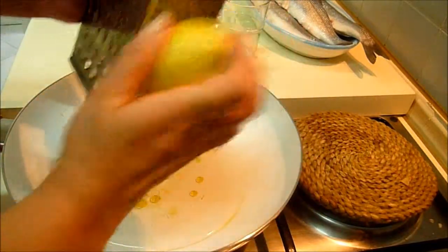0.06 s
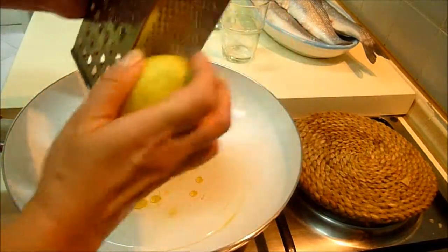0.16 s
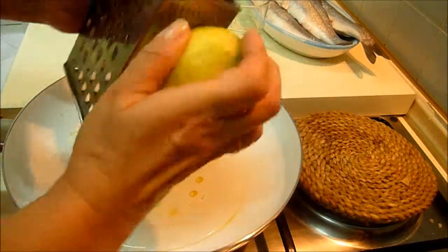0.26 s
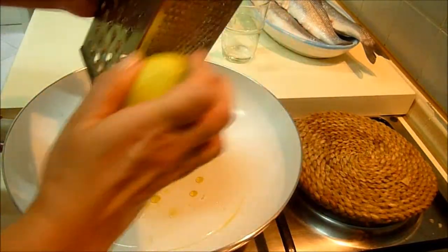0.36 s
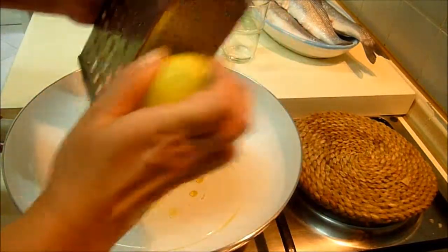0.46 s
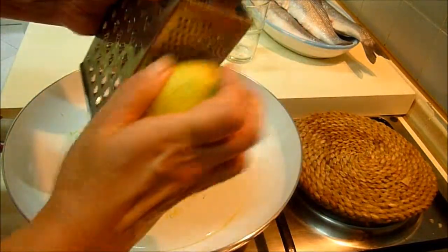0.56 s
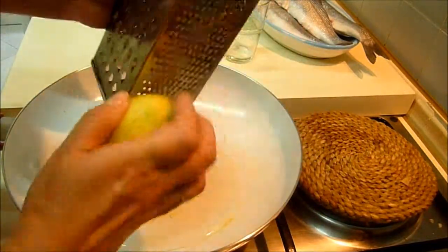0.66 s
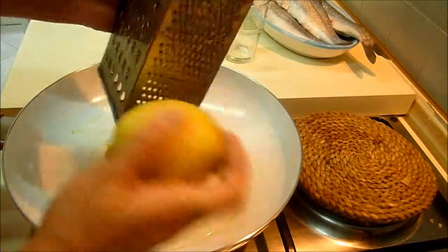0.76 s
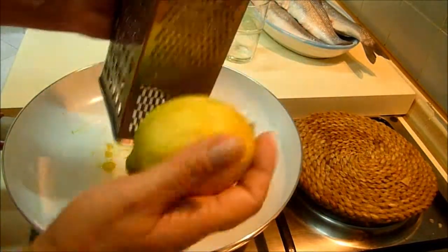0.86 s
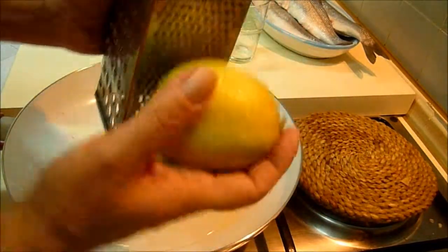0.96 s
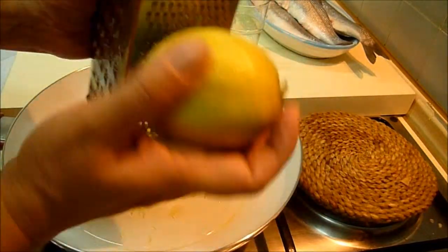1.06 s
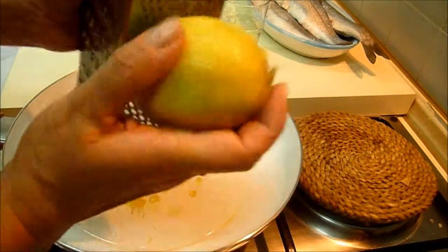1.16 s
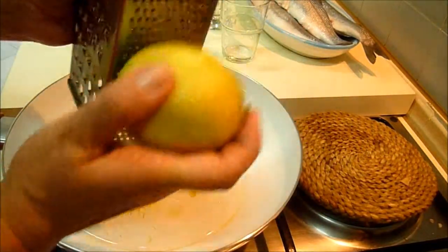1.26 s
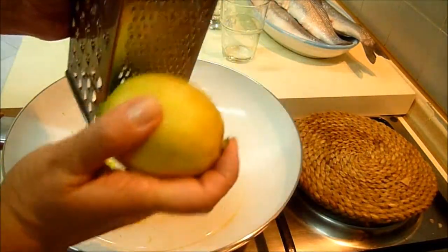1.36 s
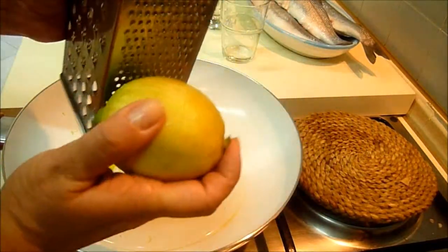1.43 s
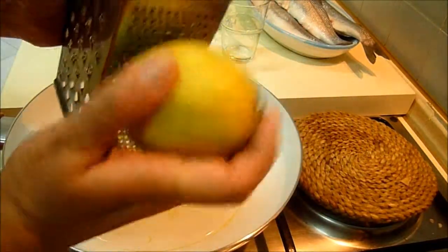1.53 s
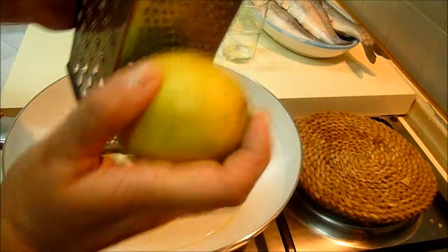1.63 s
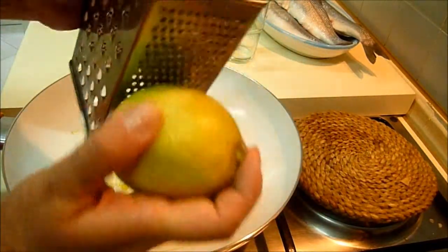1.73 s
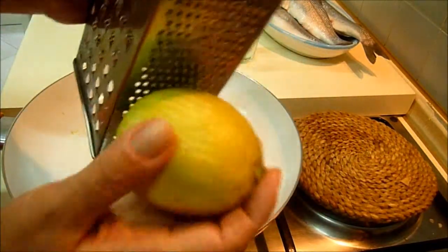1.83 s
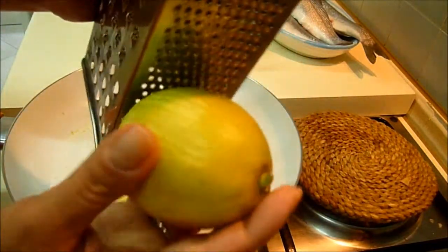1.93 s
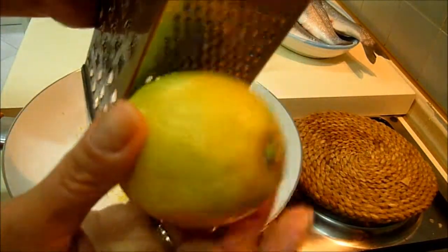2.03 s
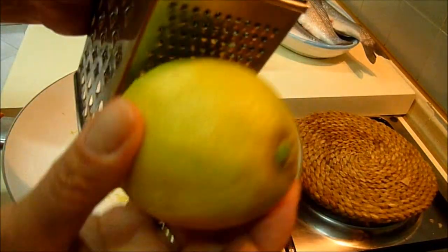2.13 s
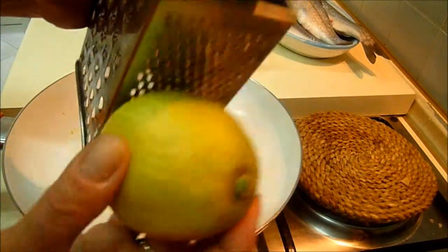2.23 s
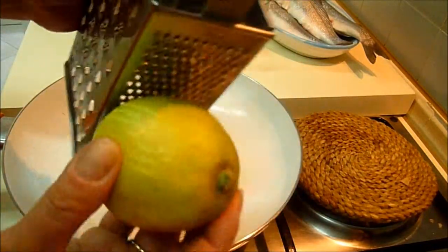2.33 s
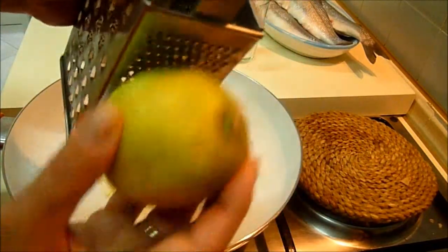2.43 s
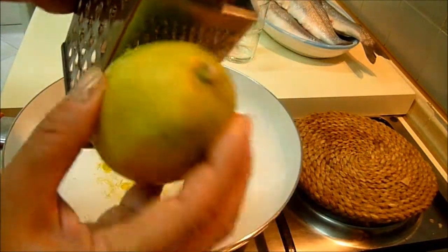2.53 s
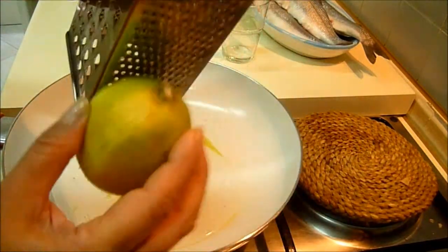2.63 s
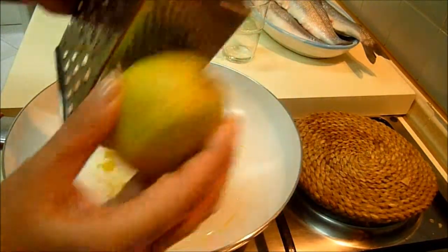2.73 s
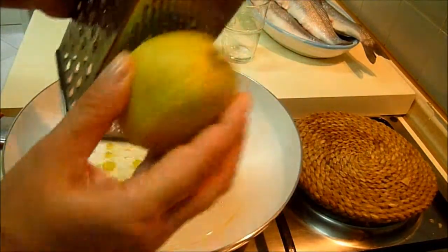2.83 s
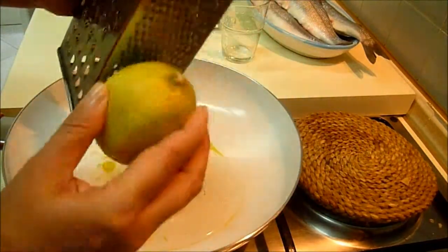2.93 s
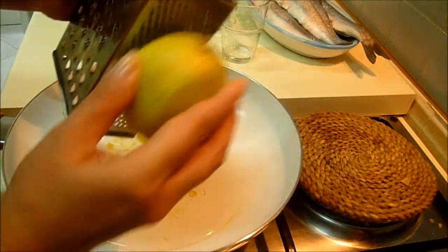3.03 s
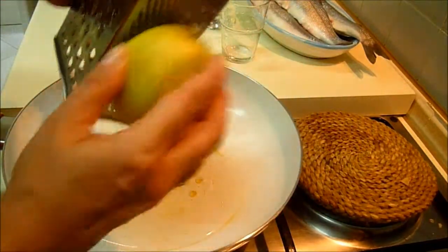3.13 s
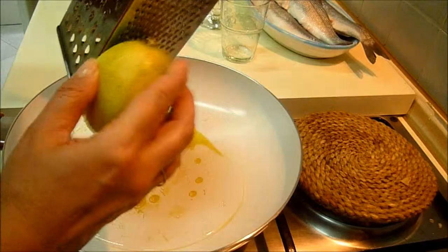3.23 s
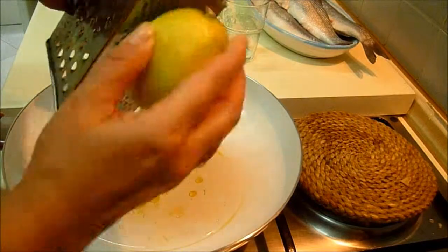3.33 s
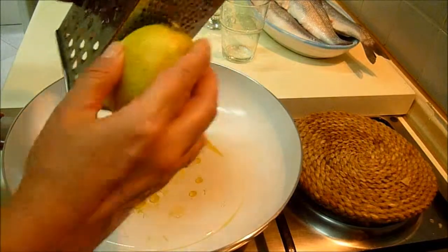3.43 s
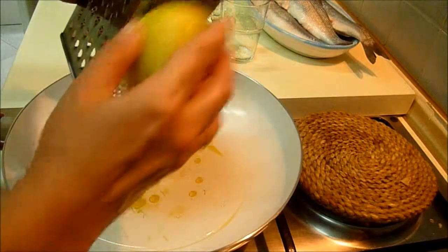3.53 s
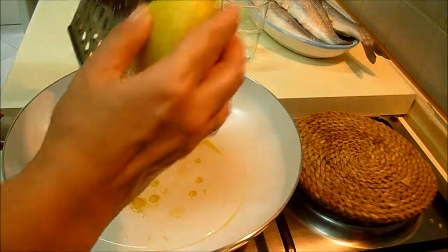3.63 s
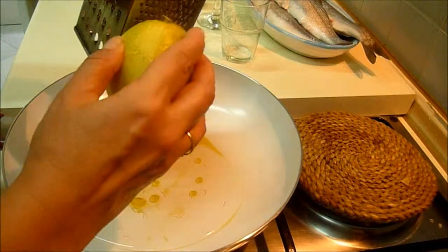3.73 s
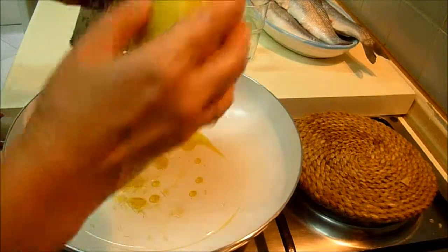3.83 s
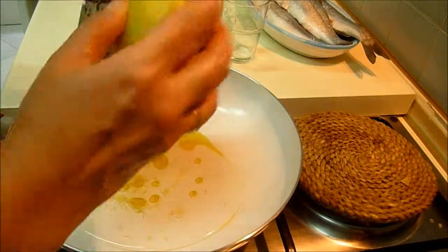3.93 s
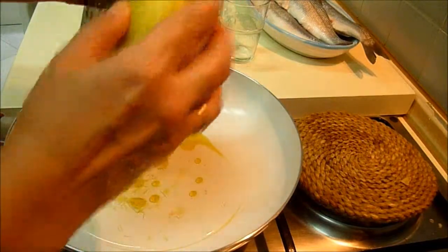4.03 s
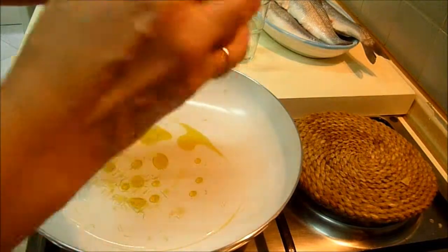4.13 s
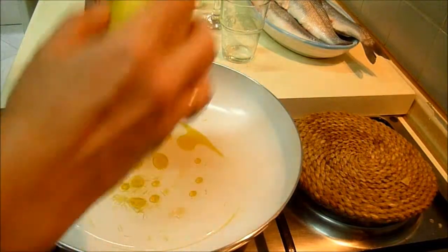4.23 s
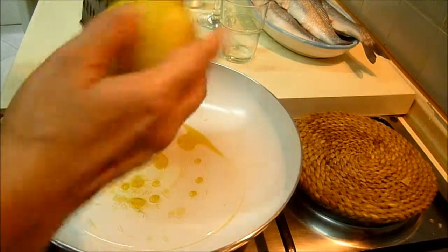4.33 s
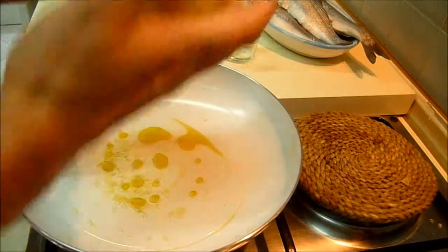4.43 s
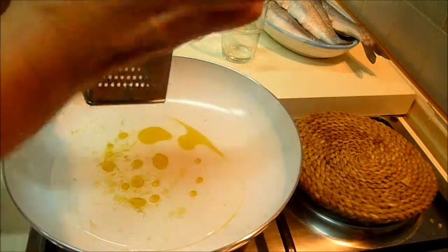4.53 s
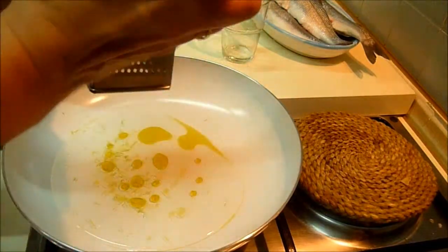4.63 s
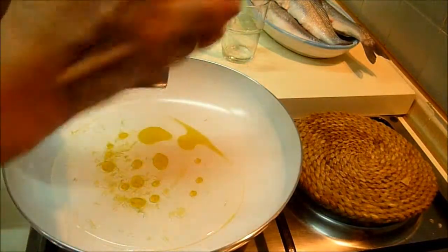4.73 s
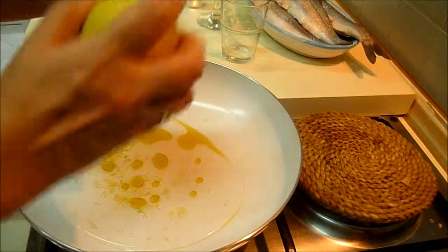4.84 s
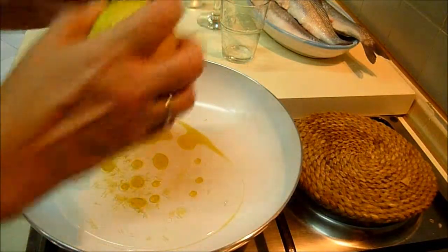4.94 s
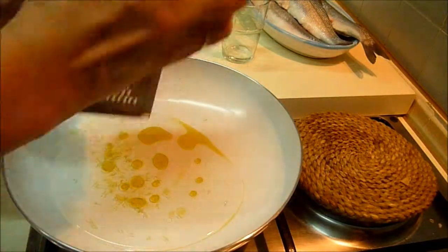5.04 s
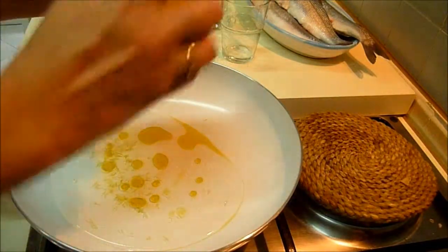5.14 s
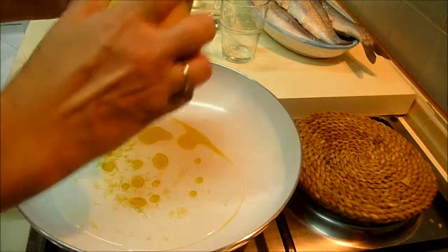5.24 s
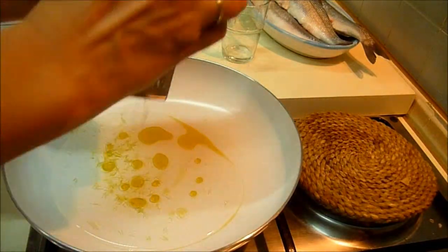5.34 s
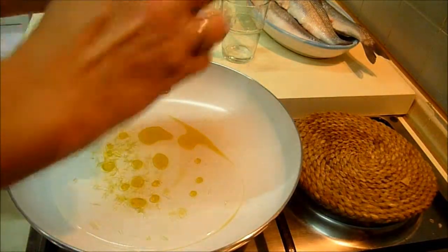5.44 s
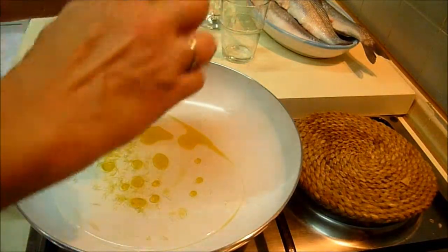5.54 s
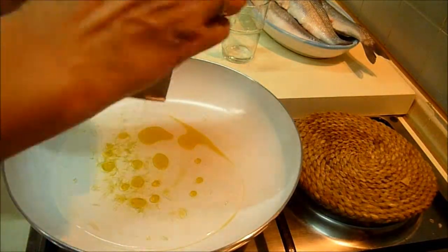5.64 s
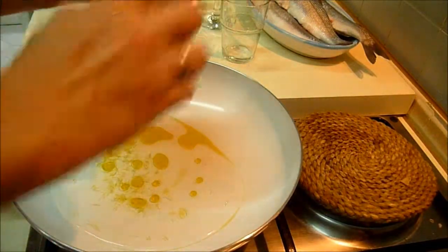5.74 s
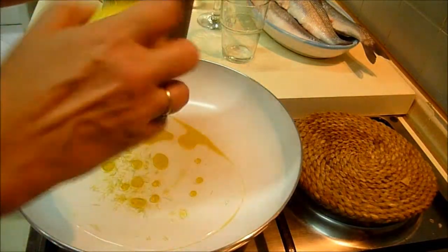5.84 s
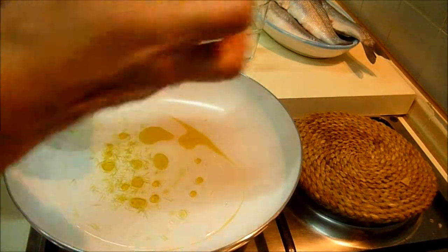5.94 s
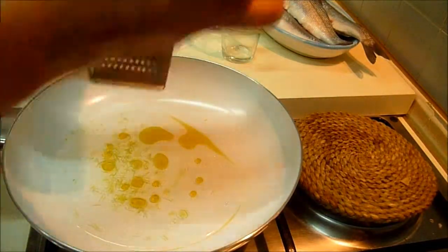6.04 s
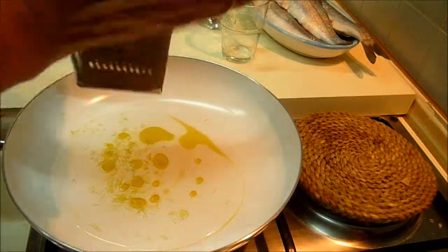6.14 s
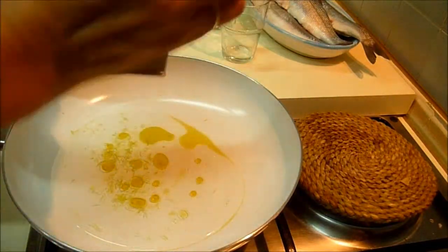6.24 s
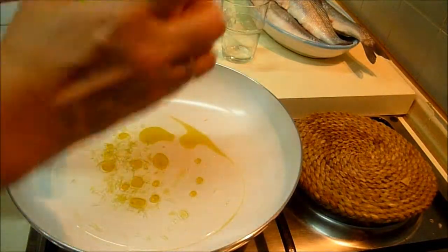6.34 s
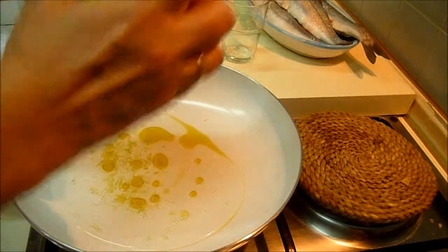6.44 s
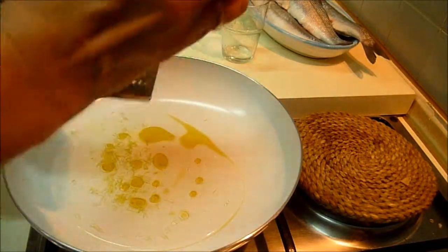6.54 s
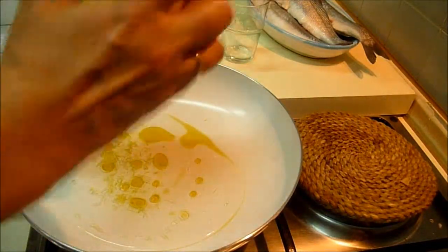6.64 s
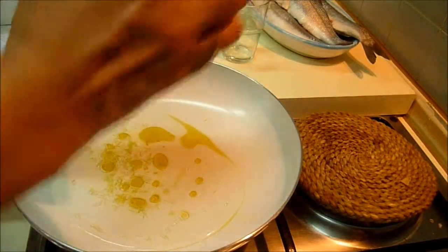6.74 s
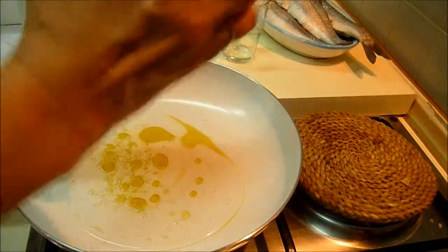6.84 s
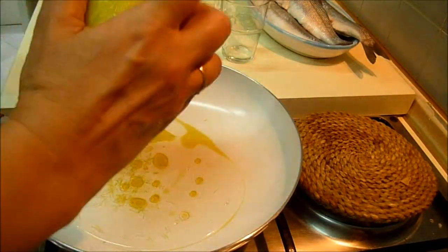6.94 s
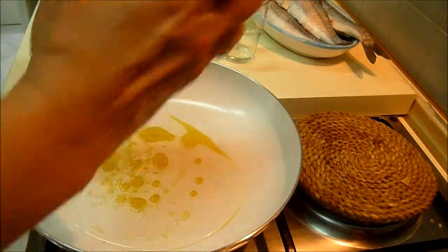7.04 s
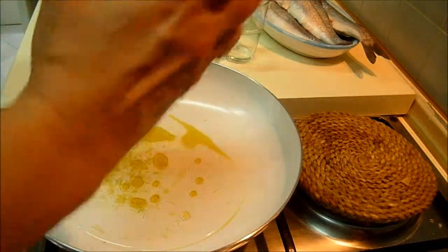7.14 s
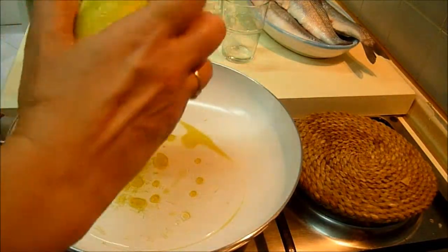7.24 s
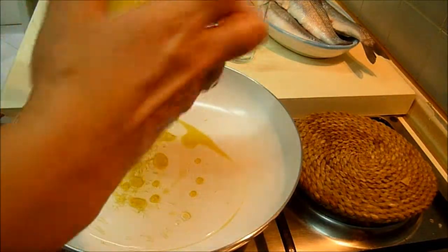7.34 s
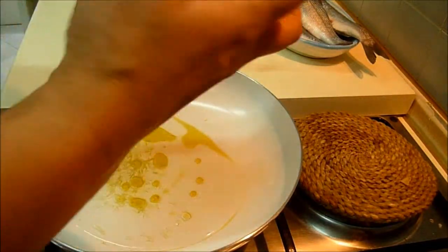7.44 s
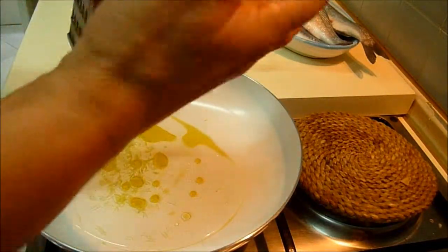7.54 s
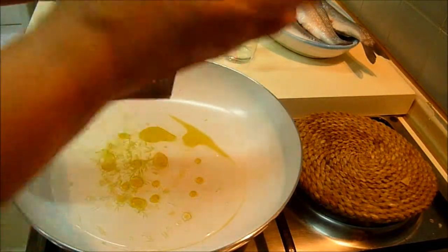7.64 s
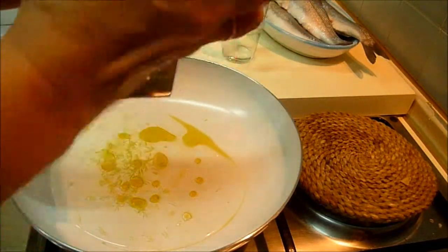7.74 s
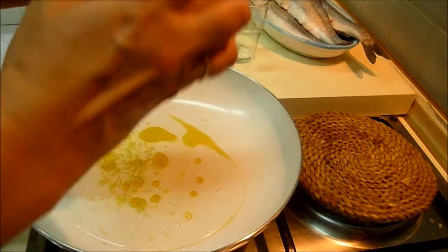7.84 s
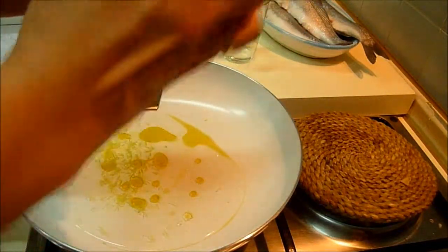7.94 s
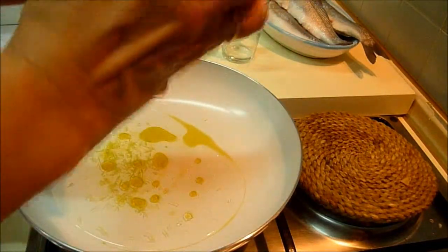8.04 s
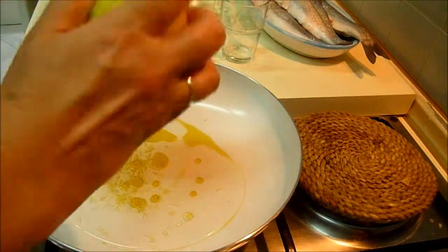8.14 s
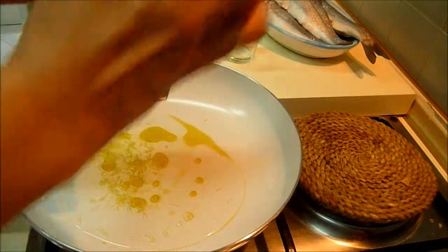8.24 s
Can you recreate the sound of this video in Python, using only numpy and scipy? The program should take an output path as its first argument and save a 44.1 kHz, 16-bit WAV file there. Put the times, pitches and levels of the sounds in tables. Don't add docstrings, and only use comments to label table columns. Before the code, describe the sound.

Close to a small camera microphone, a lemon is rubbed on a hollow steel box grater in a kitchen with a short echo. Three brisk rasps come in the first 0.7 seconds, each a rapid stutter of three or four bites with a tinny ring. Then it is sparse: a faint touch at 1, scratchy catches around 1.3 and 1.65, a small scrape near 2.2. From 2.55 regular grating begins, roughly four strokes a second, with quieter sliding returns between, growing stronger towards 4.2. A light metallic bump falls at 4.5, then longer, dense rasps continue to 5.8. The hardest hollow knock comes at 6.17, followed by a long stroke and strong, sharp rasps until 7.25. A thudding bump at 7.67 leads to scratchy catches, a last strong rasp at 8.1 and a soft slide. Low appliance hum, faint fluttering camera whine and handling rumble run throughout; the treble is cut off.

```python
import sys
import numpy as np
from scipy import signal
from scipy.fft import rfft, irfft
from scipy.io import wavfile
from scipy.ndimage import uniform_filter1d, map_coordinates

SR = 44100
rng = np.random.default_rng(int(sys.argv[2]) if len(sys.argv) > 2 else 0)


def persist_wave(psi):
    counts = np.round(np.clip(psi, -1, 1) * 32767).astype(np.int16)
    wavfile.write(sys.argv[1], SR, np.atleast_2d(counts).T)


def amplitude_ratio(level_db):
    exponent = np.asarray(level_db, float) / 20
    return 10 ** exponent


N = 365588


def unit(x):
    return x / np.sqrt(np.mean(x ** 2) + 1e-20)


def along(points, hz):
    f, v = np.transpose(points)
    return np.interp(np.log(hz + 1), np.log(f + 1), v)


def colour(spectrum, peaks, hz):
    peaks_db = sum(db / (1 + (2 * (hz - centre) / width) ** 2) for centre, width, db in peaks)
    return amplitude_ratio(along(spectrum, hz) + peaks_db)


def resonance(hz, centre, width):
    return 1 / (1 + (2 * (hz - centre) / width) ** 2)


def coloured(x, gain):
    m = 2 ** 14
    cepstrum = irfft(np.log(gain(np.fft.rfftfreq(m, 1 / SR)) + 1e-6))
    cepstrum[1:m // 2] *= 2
    cepstrum[m // 2 + 1:] = 0
    response = irfft(np.exp(rfft(cepstrum)))
    return signal.fftconvolve(x, response)[:len(x)]


def wobble(rate):
    points = rng.standard_normal(int(N * rate / SR) + 4)
    return map_coordinates(points, [np.arange(N) * rate / SR])


def patchy(x, depth_db, bins, frames):
    z = signal.stft(x, nperseg=512)[2]
    field = uniform_filter1d(rng.standard_normal(z.shape), bins, 0)
    field = uniform_filter1d(field, frames, 1)
    return signal.istft(z * amplitude_ratio(depth_db * unit(field)), nperseg=512)[1][:N]


def over(hz, edge_hz):
    return 1 / (1 + (edge_hz / (hz + 1)) ** 8)


def background():
    # frequency in Hz, level in dB per Hz.
    hum_curve = [(15, -36), (25, -3), (33, -14.5), (105, -5), (194, -17), (308, -8), (594, -8), (857, -12),
                 (1180, -5), (1360, -10.5), (1500, -10.5), (1960, -18), (5200, -24), (6970, -21.5),
                 (8470, -41.5), (11000, -88.5), (18600, -120)]
    # frequency in Hz, width in Hz, dB over the hum.
    whir = [(116, 25, 3.5), (843, 54, 8), (1164, 120, 4), (1832, 98, 7.5), (3340, 80, 7.5), (5000, 220, 7)]
    # frequency in Hz, width in Hz, rms level in dB, flutter in dB.
    whine = [(6200, 190, -62, 3), (7040, 77, -65, -2), (7300, 110, -66.5, -3.5)]
    # time in seconds, level in dB.
    rumble = [(0, -50), (1, -56), (2.3, -54), (3.201, -50.5), (4.299, -59.5), (4.5, -50.5), (5, -53),
              (6, -56), (7, -52.5), (8.29, -57.5)]
    rumble_curve = [(30, -30), (110, 4.5), (300, -0.5), (700, -26)]  # Hz, dB

    hum = patchy(rng.standard_normal(N), 2.2, bins=6, frames=14)
    out = amplitude_ratio(-47) * unit(coloured(hum, lambda f: colour(hum_curve, whir, f)))
    for hz, width, db, flutter_db in whine:
        band = coloured(rng.standard_normal(N), lambda f: resonance(f, hz, width))
        flutter = 1.1 * wobble(7.4) + 1.2 * wobble(35)
        out = out + amplitude_ratio(db + flutter_db * flutter) * unit(band)
    s, db = np.transpose(rumble)
    low = coloured(rng.standard_normal(N), lambda f: colour(rumble_curve, [], f))
    return out + amplitude_ratio(np.interp(np.arange(N) / SR, s, db)) * unit(low)


def kitchen(x):
    # frequency in Hz, seconds to fall by 60 dB.
    echo_time = [(200, 0.49), (2000, 0.23), (8000, 0.22)]
    hz, t, z = signal.stft(x, SR, nperseg=256, noverlap=192)
    late = t[:300]
    fade = amplitude_ratio(-120 * late / along(echo_time, hz)[:, None])
    fade = fade * (1 - np.exp(-late / 0.0036))
    fade = fade / fade.sum(1, keepdims=True)
    power = uniform_filter1d(np.abs(z) ** 2, size=3, axis=0)
    power = signal.fftconvolve(power, fade, axes=1)[:, :len(t)]
    noise = signal.stft(rng.standard_normal(N), SR, nperseg=256, noverlap=192)[2]
    echo = np.sqrt(np.abs(power)) * noise / np.std(noise)
    return signal.istft(echo, SR, nperseg=256, noverlap=192)[1][:N]


def knocks():
    # start in seconds, peak in dB, crack in dB, thud in dB.
    bumps = [
        (.988, -52, 18, -2),
        (4.528, -29.5, 4.5, 2),
        (6.17, -15.5, 0, -1),
        (6.174, -34, -11, -7),
        (7.669, -29, 9, 10),
        (7.674, -30, -3.5, 11),
    ]
    # frequency in Hz, level in dB, seconds to fall by 60 dB.
    box = [(680, 3, 0.085), (1088, 2.5, 0.063), (1814, -9, 0.11), (2230, 1, 0.027), (2400, 0.5, 0.012)]
    crack_curve = [(200, 6), (2500, -0.5), (6000, -7), (8000, -26.5)]  # Hz, dB

    out, t = np.zeros(N + SR), np.arange(SR // 4) / SR
    for s, db, crack_db, thud_db in bumps:
        ring = 0
        for hz, level_db, t60 in box:
            ring = ring + amplitude_ratio(level_db + rng.normal(0, 1) - 60 * t / t60) * np.sin(2 * np.pi * hz * t)
        dull = coloured(rng.standard_normal(len(t)), lambda f: colour(crack_curve, [], f))
        crack = amplitude_ratio(crack_db - 60 * t / 0.046) * unit(dull)
        thud = amplitude_ratio(thud_db - 5.5 - 60 * t / 0.09) * np.cos(2 * np.pi * 130 * t)
        onset = 1 - np.exp(-t / 0.00029)
        out[round(s * SR):][:len(t)] += amplitude_ratio(db - 9) * (thud + crack - ring) * onset
    return out[:N]


def hand(s):
    # time in seconds, ringing of the face's main tone in dB, shaking of the box in dB,
    # rind drag under the bites in dB, brightness of fresh rind in dB.
    grip = [(.08, -11.5, -19, -8, 0.5), (.35, -12, -25, -12, 1.5), (.6, -7.5, -24.5, -0.5, 1.5),
            (1.3, -8, -13.5, -12, -1.5), (2.6, -6.5, -27, -11.5, 2.5), (3.17, -4, -21, -13, 2),
            (3.44, -5.5, -25, -29, -1.5), (3.69, -4.5, -26, -6.5, -0.5), (3.95, -5.5, -17, -19.5, -1.5),
            (4.22, -3.5, -31.5, -4.5, 1), (4.8, -13.5, -24, -15, 0), (5.139, -11.5, -28, -17, 1.5),
            (5.74, -8.5, -24, -5.5, -0.5), (6.3, -7, -19, -18, 4), (6.62, -12.5, -20, -15, -1.5),
            (6.89, -5.5, -22.5, -21, -0.5), (7.2, -3, -35.5, -8, 4), (8.08, -11.5, -13.5, -13, -0.5)]
    when, *controls = np.transpose(grip)
    return [np.interp(s, when, control) for control in controls]


def contacts():
    # first bite in seconds, last bite in seconds,
    # first bite in dB, middle bite in dB, last bite in dB.
    three_rows = [
        (.058, .105, -20.5, -23.5, -26.5),
        (3.401, 3.466, -29, -19, -26.5),
        (3.926, 3.98, -24.5, -22, -25),
        (6.596, 6.649, -22, -17, -19),
        (6.858, 6.922, -25.5, -17, -22),
        (8.056, 8.109, -21, -18.5, -21),
    ]
    four_rows = [
        (0.322, 0.383, -29, -23.5, -27.5),
        (.588, 0.648, -23.5, -29, -40),
        (2.558, 2.629, -32.5, -23, -39),
        (5.424, 5.492, -24, -22.5, -29),
        (2.879, 2.942, -24, -26, -33),
        (3.136, 3.207, -30.5, -24, -31),
        (3.647, 3.714, -34, -21, -24),
        (4.183, 4.255, -20, -19.5, -33),
        (7.157, 7.231, -23, -24, -31.5),
    ]
    five_rows = [
        (4.695, 4.766, -34, -27.5, -32),
        (4.781, 4.861, -26, -24.5, -27.5),
        (5.093, 5.183, -27.5, -19.5, -28.5),
        (5.696, 5.776, -27, -20.5, -29.5),
    ]
    six_rows = [
        (6.251, 6.368, -31.5, -24, -26.5),
    ]
    # time in seconds, peak in dB, half length in ms.
    catches = [(.013, -51, 13), (.128, -36.5, 3.7), (.306, -52, 2.1), (.557, -56, 2.2), (.575, -33, 11),
               (1.225, -46, 5.8), (1.252, -40, 2.6), (1.275, -33, 5.6), (1.316, -26, 3.9),
               (1.339, -28, 5.7), (1.606, -34, 6), (1.64, -28.5, 8.2), (1.683, -33, 3.6), (2.199, -31.5, 5),
               (2.848, -32.5, 5.3), (5.518, -32, 2.2), (4.645, -47, 2.6), (4.668, -54, 3.9),
               (5.394, -28, 6.7), (6.222, -27, 3.5), (6.391, -38, 2.8), (6.565, -43, 1.8),
               (7.112, -45, 4.3), (7.129, -32.5, 4.2), (7.722, -41, 1.9), (7.754, -29, 6.2),
               (7.783, -25.5, 5.3), (7.828, -28.5, 6.2), (8.027, -41, 2.7), (8.129, -26, 2.5)]
    # middle in seconds, peak in dB, half length in ms,
    # panel drumming in dB.
    returns = [(0.219, -43.5, 18.4, -1), (0.478, -40.5, 17.4, 1.5), (1.501, -49, 14.3, -5.5),
               (2.069, -51, 14, -1), (2.181, -41.5, 9.9, -6), (2.734, -41, 21, -2), (3.03, -46, 16, 1),
               (3.29, -39.5, 18, 1), (3.55, -41, 11.7, -5), (3.813, -33, 18, 1), (4.082, -37, 16.7, 1.5),
               (4.986, -42.5, 24, 3.5), (5.295, -42.5, 20, -4), (5.6, -38.5, 12, 2), (6.476, -39, 17.3, 5),
               (6.76, -39, 13.7, 1), (7.029, -41, 17.7, 3), (7.952, -50, 18, 1.5), (8.225, -38.5, 18, 2)]
    speed_up = .95
    bite_ms, bite_scatter = 4.2, .12
    dig_per_db, dig_from_db = .15, 2.5
    drag_share, drag_late = .32, .6
    ticks, tick_db, tick_ms = 3, -2, 2

    rows = list(catches)
    for count, strokes in enumerate((three_rows, four_rows, five_rows, six_rows), start=3):
        u = np.linspace(0, 1, count)
        for first, last, first_db, middle_db, last_db in strokes:
            length = last - first
            bulge_db = 2 * middle_db - first_db - last_db
            level_db = first_db + (last_db - first_db) * u + bulge_db * 2 * u * (1 - u)
            ms = bite_ms * np.exp(bite_scatter * rng.standard_normal(count))
            early_ms = (u == 0) * ms * dig_per_db * max(middle_db - first_db - dig_from_db, 0)
            rows += zip(first + length * u ** speed_up - early_ms / 2000, level_db, ms + early_ms)
            middle = first + length * drag_late
            drag_db = hand(middle)[2]
            rows.append((middle, middle_db + drag_db, 1000 * length * drag_share))
    for s, db, ms, _ in returns:
        for x in rng.uniform(-1.5, 1.5, ticks):
            rows.append((s + ms / 1000 * x, db + tick_db, tick_ms))
    return [(*row, 0) for row in rows] + list(returns)


def grating():
    # frequency in Hz, level in dB per Hz.
    rasp = [(35, -48.5), (70, -14.5), (200, -17), (430, -6), (940, -10.5), (1340, -6.5), (2000, -10),
            (2400, -4), (3550, -7), (4550, -3.5), (7030, -7), (7640, -13), (8470, -35.5), (11000, -74.5)]
    # frequency in Hz, width in Hz, dB over the rasp.
    sheet = [(520, 220, 1.5), (1340, 130, 5), (1800, 90, 3), (2680, 220, 3.5), (2930, 160, 2.5),
             (3220, 110, 2), (4000, 90, 2.5), (4400, 90, 2), (4700, 90, 2.5), (5450, 100, 2),
             (5820, 180, 3), (6960, 90, 3)]
    face_hz, face_width_hz = 2430, 220
    edges = [0, 330, 1750, 3600, SR]  # Hz, between box, panel, sheet and teeth
    pointed = 1.8

    tears = rng.standard_normal(N) * amplitude_ratio(2.2 * wobble(2500))
    tears = patchy(tears, 2.4, bins=4, frames=3)
    tears = tears / np.sqrt(uniform_filter1d(tears ** 2, 300))
    s, db, ms, extra_db = np.transpose(contacts())[:, :, None]

    lighter_db = -26 - db
    chance = rng.standard_normal((3, len(s), 1))
    face_db, shake_db, _, fresh_db = hand(s)
    drum_db = -9 + .45 * lighter_db + 2 * chance[0]
    thump_db = .4 * lighter_db + 2 * chance[1]
    bright_db = 1.5 - .2 * lighter_db + 2 * chance[2] + fresh_db

    step = np.arange(0, N / SR, .001)
    distance = np.abs(step - s) * 1000 / np.maximum(.7 * ms, .8)
    hold = np.exp(-.5 * distance ** pointed)

    def band(low, high):
        return lambda f: colour(rasp, sheet, f) * np.sqrt(np.abs(over(f, low) - over(f, high)))

    gains = [band(low, high) for low, high in zip(edges[:-1], edges[1:])]
    gains.append(lambda f: resonance(f, face_hz, face_width_hz))
    levels = [db + thump_db + shake_db,
              db + drum_db + extra_db,
              db - 3.5 - .5 * bright_db,
              db - 4.5 + .5 * bright_db,
              db + face_db - .5 * bright_db]
    sound = 0
    for gain, level_db in zip(gains, levels):
        power = (amplitude_ratio(2 * level_db) * hold).sum(0)
        force = np.interp(np.arange(N) / SR, step, np.sqrt(power))
        tears = np.roll(tears, 441)
        sound = sound + coloured(force * tears, gain) / np.std(coloured(tears, gain))
    return amplitude_ratio(3.5) * sound


def scene():
    near = grating() + knocks()
    return (near + amplitude_ratio(-9.5) * kitchen(near) + background())[None]


def roll_off(x):
    return signal.sosfilt(signal.butter(12, 8620, fs=SR, output="sos"), x)


def record(dry):
    # time in seconds, level in dB.
    jolts = [
        (3.44, -49),
        (4.21, -26),
        (6.62, -34),
        (6.89, -34),
        (8.09, -38),
    ]
    band_limit = [(7600, -1), (8000, -8), (8300, -22), (8600, -32.5), (8800, -61)]  # Hz, dB
    t = np.arange(N) / SR
    jumps = 0
    for s, db in jolts:
        since = np.abs(t - s)
        jumps = jumps + amplitude_ratio(db) * (t > s) * (1 - np.exp(-since / .0044)) * np.exp(-since / .03)
    squeezed = dry / (1 + np.abs(dry / .55) ** 5) ** (1 / 5)
    hz = np.fft.rfftfreq(N, 1 / SR)
    limited = irfft(rfft(squeezed) * amplitude_ratio(along(band_limit, hz)), N)
    offset = .0169
    return roll_off(limited + offset + jumps)


dry = scene()
out = record(dry)
persist_wave(out)
```